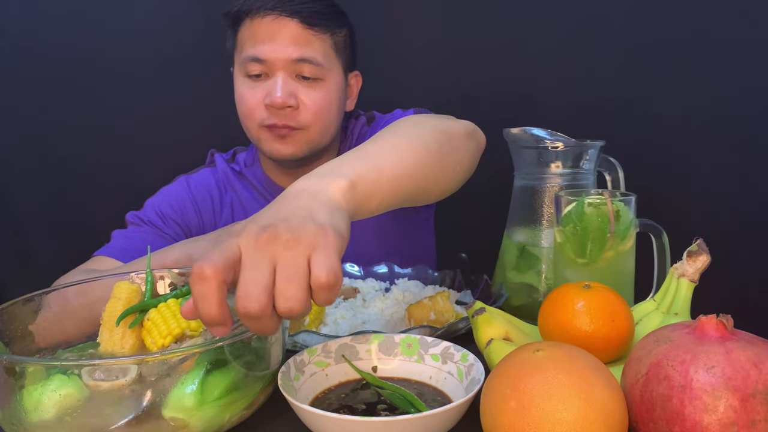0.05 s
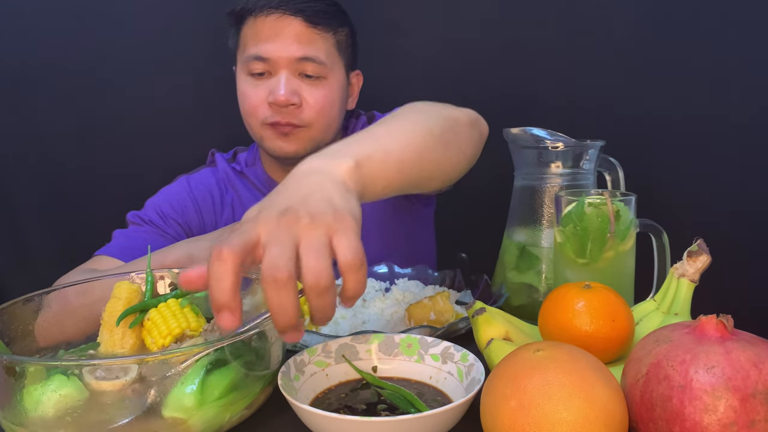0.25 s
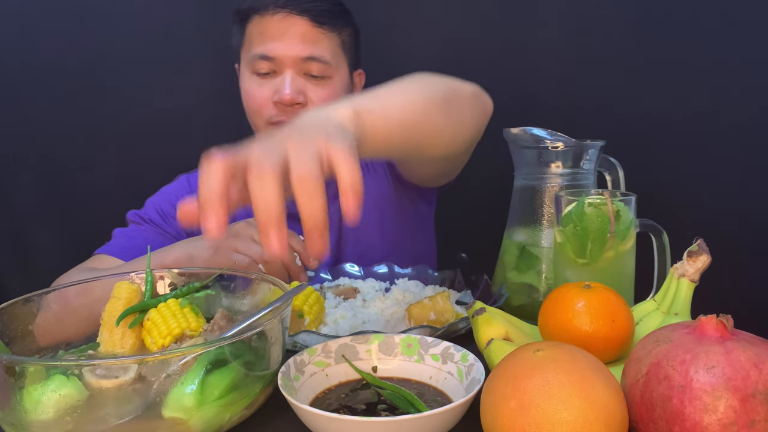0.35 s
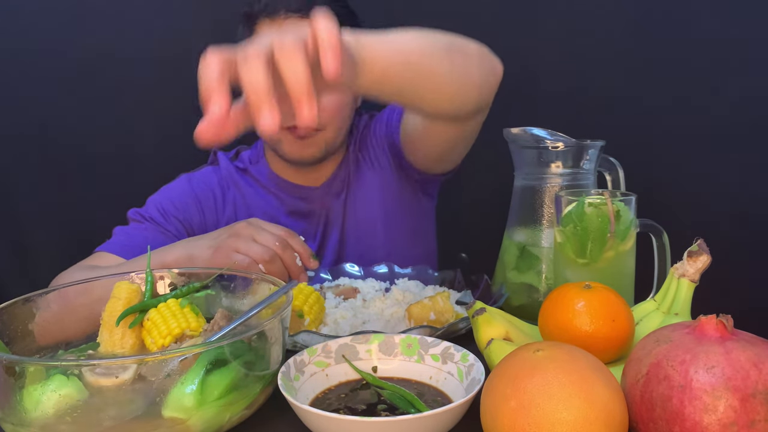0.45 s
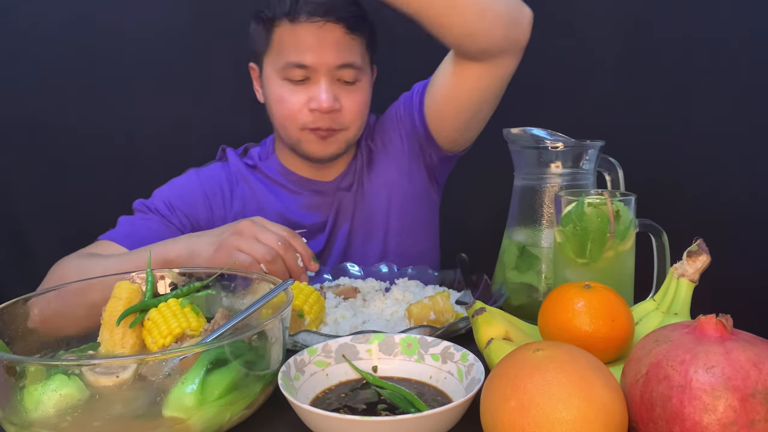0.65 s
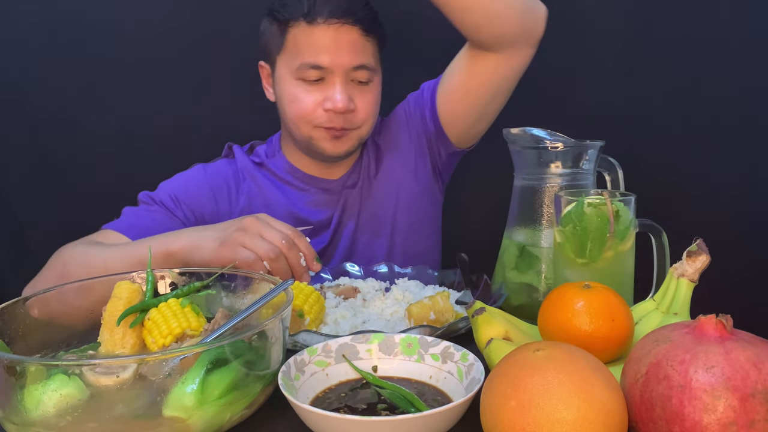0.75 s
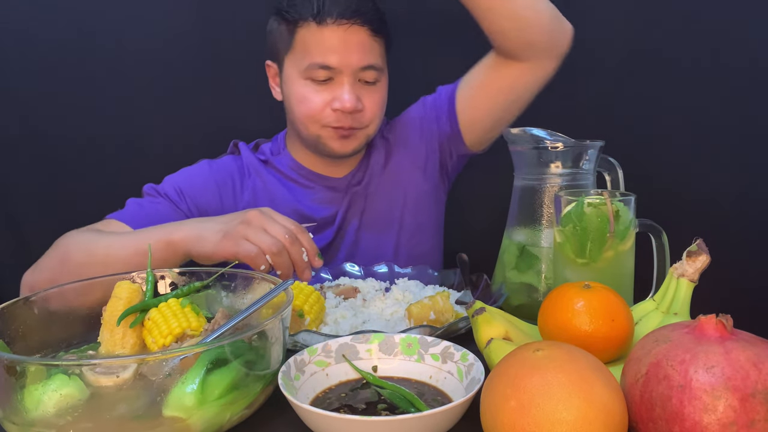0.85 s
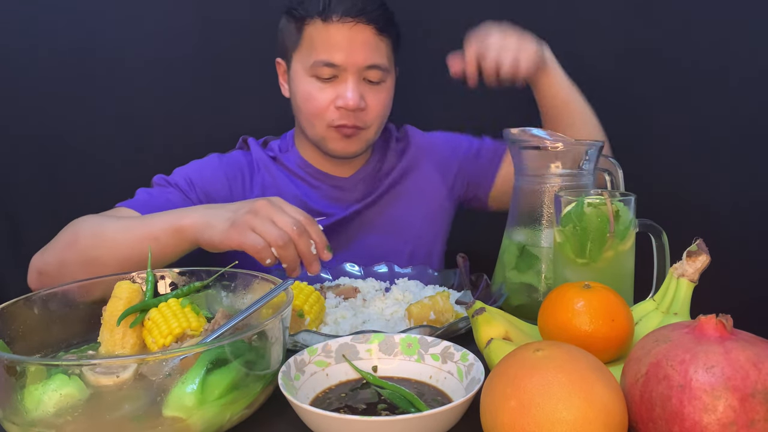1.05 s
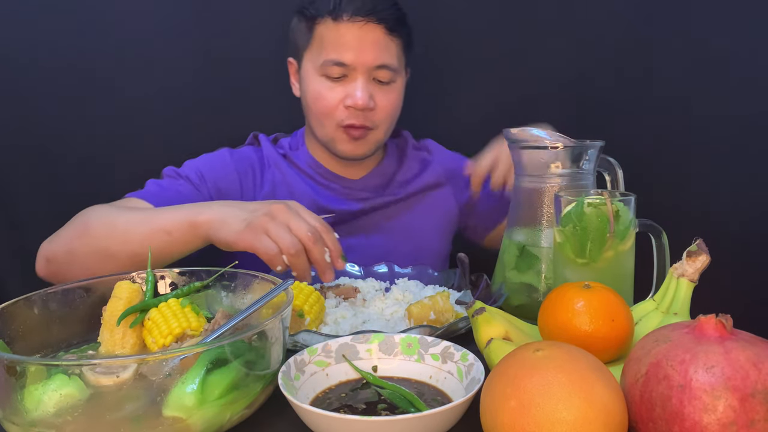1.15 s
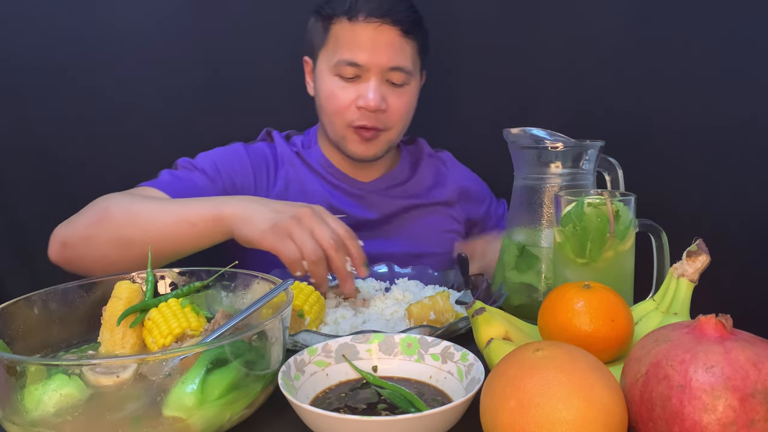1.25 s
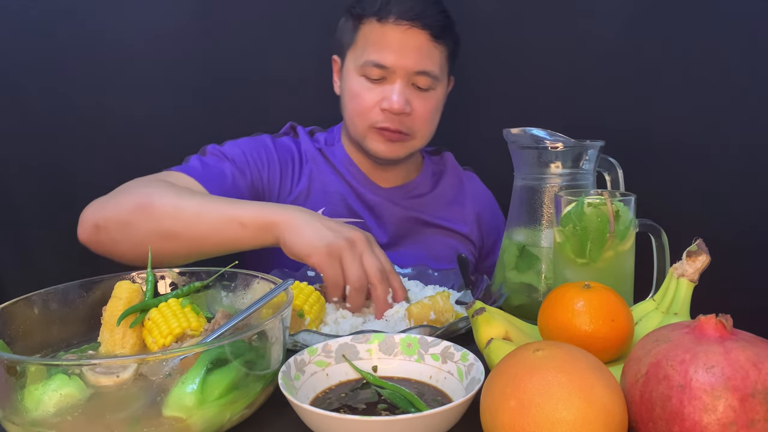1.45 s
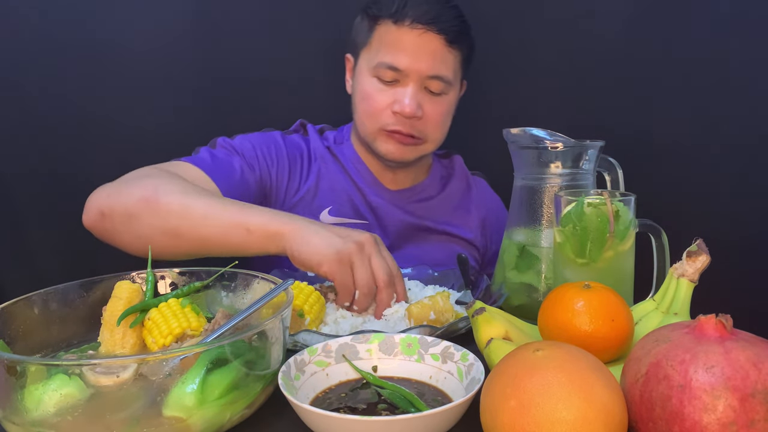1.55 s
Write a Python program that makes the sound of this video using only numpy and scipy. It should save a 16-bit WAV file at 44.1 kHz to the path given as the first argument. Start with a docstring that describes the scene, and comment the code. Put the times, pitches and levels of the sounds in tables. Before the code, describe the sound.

Close stereo pickup at a dining table: one loud spoon clink on glass, brief chatter and faint rubbing squeaks, a much softer tap, then near quiet with tiny finger ticks in rice, cloth rustle and low hum.

```python
"""Over room hush and a wavering hum, an earlier touch on a glass bowl is dying away on a dining table.
A metal spoon drops on the rim with a clink and a table thump, then chatters and slides with rubbed tones;
then it taps once more. Later, fingers tick in sticky rice and a sleeve rustles.
Dying sine waves make the rings, thump and ticks' tones; shaped noise makes the clatter, clicks, cloth and air;
the hum and the bowl's notes are sine waves. A fading noise echo adds the room to the table sounds."""
import sys
import numpy as np
from scipy import signal
from scipy.fft import rfft, irfft, next_fast_len
from scipy.io import wavfile
from scipy.ndimage import map_coordinates

SR = 44100
rng = np.random.default_rng(int(sys.argv[2]) if len(sys.argv) > 2 else 0)


def inscribe(sig):
    """Save sig as 16-bit PCM at rate SR to the path in sys.argv[1].

    A 1-D sig is mono; a 2-D sig holds one channel per row.
    Samples are clipped to [-1, 1] before scaling.
    """
    pcm = np.round(np.clip(np.atleast_2d(sig).T, -1, 1) * 32767)
    wavfile.write(sys.argv[1], SR, pcm.astype(np.int16))


N = 70560

# In every table, t60 is the time to fade by 60 dB; a positive left-right value means left is louder.
# The room's hush, relative: (frequency [Hz], level [dB per Hz])
HUSH_COLOUR = [(15, -33.5), (25, -10), (80, -2.5), (126, -13), (307, -18), (788, -27.5), (855, -22.5),
               (1150, -29.5), (1280, -28), (2510, -39.5), (3670, -54.5), (8010, -53), (8920, -57),
               (12000, -53), (15700, -61.5)]
# How alike the hush is on both sides: (frequency [Hz], likeness [1 = same])
HUSH_LIKENESS = [(60, 0.93), (180, 1), (550, 0.28), (1650, 0.048), (4970, 0.17), (15000, 0.58)]
# The hum before its random wavering: (time [s], level [dB])
HUM_LEVELS = [(0.0, -56), (0.19, -39), (0.368, -58), (0.386, -55), (0.672, -51.5), (0.712, -37),
              (1.038, -57), (1.068, -43), (1.6, -40.5)]
# Ways the bowl and spoon ring, relative: (frequency [Hz], t60 [s], left-right [dB], left leads [rad],
# clink level [dB], tap level [dB], earlier touch level [dB], sliding level [dB])
RING_MODES = [(353, .08, 1, -1.5, -23, -56, -42.5, -30.5), (608, .25, -0.5, 1.8, -30, -24, -8, -26),
              (622, .075, 1, 1.4, -10, -28, -26, -26), (890, .07, -0.5, 0, -33, -26, -29.5, -15),
              (1345, .11, 2.5, .3, -13.5, -14.5, -9, 4.5), (1352, .08, 0, 0.5, -21.5, -26, -22.5, -18),
              (2090, .04, 0, .8, -30, -30, -30, -1.5), (2175, .08, -1, .8, -19.5, -22, -33, -7.5),
              (2236, .2, -1.5, .8, -29.5, -26, -3.5, -8), (2322, .08, -4.5, 11, -17.5, -27, -32, -15),
              (2300, .1, -5, .8, -32, -18, -14, -6), (4890, 0.17, -2.5, 2, -32.5, -37, -17, -26),
              (2772, .12, -3, 0, -33.5, -43, -23.5, -17), (2935, .2, 0.5, -0.5, -32.5, -38, -23.5, -22),
              (3318, .14, 3, 1, -20, -9.5, -20.5, -1.5), (3475, .1, -3, 1, -15, -15.5, -22.5, -7.5),
              (3550, .15, 0, -2.5, -34.5, -34, -15, -22.5), (4536.5, .12, 4.5, 1.7, -6.5, -9, -24, -8),
              (4496, .07, 4.5, 1.7, -12.5, -24, -30, -20), (4610, .14, 5.5, 2, -21, -5.5, -17, -3),
              (5712, .12, 1, 0, -30, -40, -30, -24), (6013, .3, 2, 0.5, -24, -28, -28.5, -12),
              (6197, .2, -3.5, 0.5, -30, -30, -40, -20), (6285, .13, 1, 0, -40, -40, -12, -30),
              (7079, .14, 1, 0, -24, -54, -38.5, -26), (7180, .16, 2, 0, -53, -53, -10, -36.5),
              (7650, 0.17, 4, 1.5, -22.5, -6.5, -12.5, -12), (7850, .13, -9, 0, -22, -19.5, -27.5, -15),
              (8790, .16, 9, -0.5, -33, -24, -9.5, -31), (9445, .16, 2, 1, -19, -31, -6.5, -13),
              (9850, 0.12, 6, 1, -19.5, -21, -7, -28.5), (10932, 0.061, 0.5, -1.5, -13.5, -17.5, -8, -29.5),
              (11420, .09, -0.5, 1.5, -9.5, -20.5, -20, -14.5), (12090, .13, 0, 0, -29, -34, -24, -24),
              (12350, .15, -0.5, -1.5, -31.5, -34, -14, -22), (13570, .14, -5, 0, -26.5, -28, -26, -20.5),
              (14300, .1, -3, -1.5, -32, -37, -9, -40.5)]
# Clink, tap, earlier touch: (time [s], level [dB], build-up [cycles], share of free ring time [ratio],
# clatter level over the blow's [dB], clatter t60 [s])
SPOON_BLOWS = [(.1814, -3.5, 3.5, 0.79, -13, .025), (.5902, -18.5, 3.7, 0.48, -18, 0.099),
               (-0.0038, -34.5, 2.8, 1.1, -5.5, 0.17)]
# The many small ways the clatter rings, relative: (frequency [Hz], level [dB per Hz])
CLATTER_COLOUR = [(250, -38), (600, -30), (1300, -17.5), (2200, -5), (3400, -10), (4650, -5), (5400, -31.5),
                  (6100, -11), (6800, -27), (7700, -13), (9760, -13.5), (12200, -25.5), (13000, -32.5),
                  (14000, -23), (15500, -52.5)]
# How fast the room's echo dies: (frequency [Hz], t60 [s])
ROOM_FADES = [(300, 0.4), (3000, 0.16), (12000, .2)]
# The spoon chatters, then slides: (time [s], drive of the modes [dB], finer wash [dB])
SLIDE_LEVELS = [(.181, -76.5, -58), (.183, -19.5, -30), (.2, -23, -29), (0.231, -25, -29),
                (0.259, -40, -38.5), (0.298, -44.5, -58.5), (.36, -51, -56.5), (.39, -47.5, -55),
                (.42, -58.5, -63.5), (0.468, -50.5, -66.5), (.52, -55, -55.5), (.55, -50.5, -62.5),
                (.585, -47, -68), (.65, -68, -72), (.72, -82, -69.5)]
# Short rubbed tones, before random flutter: (time [s], half length [s], frequency [Hz], glide [Hz per s],
# peak level [dB], left-right [dB])
RUBBED_TONES = [(0.335, 0.0033, 883, -1, -46.5, -3), (.385, 0.026, 1395, -300, -46.5, 1),
                (.387, 0.011, 4660, 0, -42, 5), (.388, 0.017, 922, 600, -52.5, -1),
                (0.391, 0.014, 2086, -0.5, -53, -1), (0.395, 0.0077, 3405, 0, -43.5, 3),
                (0.406, 0.0088, 2186, 0, -47.5, 0), (0.423, .012, 2292, 0, -47, -2),
                (0.456, 0.012, 1950, -8, -58.5, 1), (0.472, 0.028, 3420, 300, -54.5, 5),
                (0.477, 0.0068, 2570, 0, -48.5, 4.5), (0.499, 0.012, 2060, 0, -44.5, 3),
                (0.515, 0.041, 2251, 804, -48, -1), (.549, .003, 2150, 0, -37, -2),
                (.56, .008, 2110, -500, -41, -1), (0.538, 0.015, 2730, -5, -56, 0)]
# The bowl's main note, fed and choked by the rebounding spoon: (time [s], peak level [dB])
CLINK_NOTE = [(.1816, -32), (.184, -7), (.2, -4), (.222, -7.5), (.232, -20.5), (.243, -36), (.251, -20),
              (.27, -22.5), (.3, -29.5), (.36, -44.5), (.44, -75)]
# The same for the tap: (time [s], peak level [dB])
TAP_NOTE_LEVELS = [(.5895, -45), (.594, -22), (.598, -19.5), (.602, -23), (.607, -30), (.614, -28.5),
                   (.619, -32), (.623, -42), (.63, -38), (.645, -54), (.69, -66)]
# Sticky ticks, before grain and left-right balance: (time [s], low ring [Hz], low level [dB],
# high ring [Hz], high level [dB], click level [dB])
RICE_TICKS = [(0.871, 3300, -71, 8300, -60, -66), (1.039, 1880, -62, 7000, -66, -54),
              (1.2946, 3210, -49, 11600, -42, -54), (1.2950, 4130, -59, 9000, -48, -66),
              (1.318, 3250, -48, 9250, -56, -76.5), (1.329, 3420, -45, 9100, -43, -56),
              (1.3944, 3320, -79, 10900, -56, -61.5), (1.5236, 3300, -75, 8450, -54.5, -68),
              (1.548, 3260, -77.5, 6400, -54, -70), (1.571, 3300, -78.5, 9000, -51, -61),
              (1.5765, 3300, -79.5, 8800, -47.5, -62), (1.59, 3300, -78, 10390, -53, -61.5)]
# Sleeve rustles, before random flutter: (time [s], half length [s], level [dB])
RUSTLES = [(1.032, 0.027, -58), (1.115, 0.043, -68.5), (1.219, .032, -54.5), (1.33, .025, -70),
           (1.48, .03, -78.5), (1.565, 0.048, -63.5)]
# The cloth's hiss, relative: (frequency [Hz], level [dB per Hz])
CLOTH_COLOUR = [(1470, -7), (2500, -10.5), (3420, -10), (3630, -10.5), (4270, -7.5), (5530, -9.5),
                (8480, -7.5), (15500, -20.5)]

EAR = np.array([[.5], [-.5]])  # half of each left-right difference goes to each side
AIR_DB, AIR_LAG_S = -46.5, 0.00031  # hush and hum reach the left side later
HUM_HZ, HUM_WAVER_DB = 61, 2.5
THUMP_HZ, THUMP_DB, THUMP_T60_S = 180, -38, 0.049
FINE_COUNT, FINE_WIDTH_HZ, FINE_FILL = 160, 33.1, 0.13  # narrow resonances, and a share of plain hiss
ROOM_DB = -11
SLIPS_PER_S, SLIP_SCATTER_DB = 1500, 3
NOTE_HZ, NOTE_PAN_DB = 2230.5, .1
TAP_HZ, TAP_PAN_DB = 2252, -3
NOTE_LEAD_RAD = .92  # left leads, for notes and rubbed tones
TICK_LOW_T60_S, TICK_HIGH_T60_S, CLICK_T60_S = .016, .007, .004
TOP_HZ = 15875


def amp(db):
    """Turn decibels into a plain multiplier."""
    return 10 ** (np.asarray(db) / 20)


def unit(x):
    """Scale a sound to an average strength (rms) of 1."""
    return x / np.sqrt(np.mean(x ** 2) + 1e-20)


def clock(start=0):
    """Seconds since start, held at zero before it."""
    return np.maximum(np.arange(N) / SR - start, 0)


def along(points, hz):
    """Read a curve of (frequency, value) points, evenly spaced by pitch rather than by Hz."""
    f, v = np.transpose(points)
    return np.interp(np.log(hz + 1), np.log(f + 1), v)


def wobble(rate):
    """A smooth random curve through `rate` random points each second."""
    points = rng.standard_normal(int(N * rate / SR) + 4)
    return map_coordinates(points, [np.arange(N) * rate / SR])


def filtered(x, response):
    """Strengthen, weaken or delay each frequency of a sound by a response."""
    m = next_fast_len(N + SR // 2)
    spectrum = rfft(x, m) * response(np.fft.rfftfreq(m, 1 / SR))
    return irfft(spectrum, m)[..., :N]


def rush(colour, likeness):
    """Coloured stereo noise of rms 1; mixing shared and opposite noise sets how alike the sides are."""
    def response(hz):
        turn = np.arccos(np.clip(along(likeness, hz), -1, 1)) / 2
        return amp(along(colour, hz)) * [np.cos(turn), np.sin(turn)]

    mid, side = filtered(rng.standard_normal((2, N)), response)
    return unit(np.array([mid + side, mid - side]))


def hush():
    """Room air is soft noise; the low hum is a sine wave that wavers in level and pitch."""
    def lean(hz):  # left is a little louder and later
        return amp(1.1 * EAR) * np.exp(-2j * np.pi * hz * EAR * AIR_LAG_S)

    phase = 2 * np.pi * np.cumsum(HUM_HZ + 4 * wobble(18)) / SR
    level_db = np.interp(clock(), *np.transpose(HUM_LEVELS))
    hum = amp(level_db + HUM_WAVER_DB * wobble(14)) * np.sin(phase)
    air = amp(AIR_DB) * rush(HUSH_COLOUR, HUSH_LIKENESS)
    return filtered(air + hum, lean)


def ring(t, order, share=1, cycles=0):
    """Glass and metal ring at many pitches, each building up and dying; order picks the level column."""
    out = 0
    for row in RING_MODES:
        hz, t60, pan_db, lead_rad = row[:4]
        fade_db = 60 * t / np.maximum(share * t60, .01)
        level = amp(row[order] + EAR * pan_db - fade_db)
        build = 1 - np.exp(-t * hz / (abs(cycles) + 1e-3))
        out = out + level * np.sin(2 * np.pi * hz * t + EAR * lead_rad) * build
    return out


def shimmer(strength):
    """Noise under a strength curve, rung through a crowd of narrow resonances."""
    centres = rng.uniform(1000, 15000, FINE_COUNT)

    def crowd(f):
        width = 1j * f * FINE_WIDTH_HZ
        return FINE_FILL + sum(width / (c * c - f * f + width) for c in centres)

    noise = strength * rush(CLATTER_COLOUR, [(1000, 0.42)])
    return filtered(noise, crowd) * 1.054


def blows():
    """Each blow rings bowl and spoon and gives a dying clatter; the clink also thumps the table."""
    rings, clatter = np.zeros((2, N)), np.zeros(N)
    for k, (start, db, cycles, share, clatter_db, t60) in enumerate(SPOON_BLOWS):
        t = clock(start)
        # rings are worked out for the first second only
        rings[:, :SR] += amp(db) * ring(t[:SR], order=4 + k, share=share, cycles=cycles)
        clatter += amp(db + clatter_db - 60 * t / t60) * (t > 0)
    t = clock(SPOON_BLOWS[0][0])
    thump = amp(THUMP_DB - 60 * t / THUMP_T60_S) * np.sin(2 * np.pi * THUMP_HZ * t)
    return rings + shimmer(clatter) + thump


def room(x):
    """The walls' answer: a short wait, then fading noise in which each frequency dies at its own speed."""
    hz, t, z = signal.stft(rng.standard_normal((2, SR // 2)), SR, nperseg=256)
    fade = amp(-60 * t / along(ROOM_FADES, hz)[:, None])
    tail = signal.istft(z * fade, SR, nperseg=256)[1]
    late = np.pad(x, ((0, 0), (300, 0)))  # wait in samples
    return signal.fftconvolve(late, tail / np.linalg.norm(tail[0]), axes=1)[:, :N]


def rubs():
    """Short rubbed tones swell and fade while their pitch glides and their level flutters."""
    out = np.zeros((2, N))
    for at, half, hz, glide, db, pan_db in RUBBED_TONES:
        t = np.arange(N) / SR - at
        swell = np.exp(-.5 * (t / half) ** 2)
        tone = np.sin(2 * np.pi * (hz + glide * t / 2) * t + EAR * NOTE_LEAD_RAD)
        out += amp(db + EAR * pan_db + 3.5 * wobble(110)) * swell * tone
    return out


def slide():
    """Small slips of uneven size excite the modes and a wash of finer ones; rubbed tones come and go."""
    times, *levels = np.transpose(SLIDE_LEVELS)
    t = clock()
    drive, wash = (amp(np.interp(t, times, db, left=-120, right=-120)) for db in levels)
    chance, direction, size = rng.random((3, N))
    slips = (chance < SLIPS_PER_S / SR) * np.sign(direction - .5)
    slips = slips * amp(-SLIP_SCATTER_DB * np.log(size + 1e-9))
    body = ring(t[:SR // 3], order=7)
    body = body / np.linalg.norm(body[0])
    rung = signal.fftconvolve((unit(slips) * drive)[None], body, axes=1)[:, :N]
    return rung + rubs() + shimmer(amp(1.6 * wobble(150)) * wash)


def note(levels, hz, pan_db):
    """The bowl's note: one steady pitch whose level follows a curve."""
    t = clock()
    level_db = np.interp(t, *np.transpose(levels), left=-120, right=-120)
    return amp(level_db + EAR * pan_db) * np.sin(2 * np.pi * hz * t + EAR * NOTE_LEAD_RAD)


def ticks():
    """Fingers in sticky rice: tiny clicks of bright noise, each with a grainy low and high ring."""
    out = np.zeros(N)
    hiss = np.diff(rng.standard_normal(N + 1))  # differences between neighbours sound bright
    grain = amp(2.5 * wobble(900))
    for start, low_hz, low_db, high_hz, high_db, click_db in RICE_TICKS:
        t = clock(start)
        low = amp(low_db - 60 * t / TICK_LOW_T60_S) * np.sin(2 * np.pi * low_hz * t)
        high = amp(high_db - 60 * t / TICK_HIGH_T60_S) * np.sin(2 * np.pi * high_hz * t)
        build = 1 - np.exp(-t / 0.00036)
        click = amp(click_db - 60 * t / CLICK_T60_S) * hiss * (t > 0)
        out += (low + high) * grain * build + click
    return out * amp(1.9 * EAR)


def sleeve():
    """Soft swells of fluttering cloth hiss as the arm comes down."""
    t = clock()
    swell = sum(amp(db) * np.exp(-.5 * ((t - at) / half) ** 2) for at, half, db in RUSTLES)
    hiss = rush([(900, -49)] + list(CLOTH_COLOUR), [(1000, 0.56)])
    return swell * amp(1.5 * wobble(170)) * hiss


def scene():
    """Add up the table sounds, their echo, the bowl's notes, the sleeve and the hush."""
    table = blows() + slide() + ticks()
    notes = note(CLINK_NOTE, NOTE_HZ, NOTE_PAN_DB) + note(TAP_NOTE_LEVELS, TAP_HZ, TAP_PAN_DB)
    return table + notes + amp(ROOM_DB) * room(table) + sleeve() + hush()


def record(dry):
    """Round off the loudest peaks, remove everything from the top frequency up, and limit to full scale."""
    rounded = dry / (1 + np.abs(dry) ** 8) ** (1 / 8)
    return np.clip(filtered(rounded, lambda hz: hz < TOP_HZ), -1, 1)


dry = scene()
out = record(dry)
inscribe(out)
```